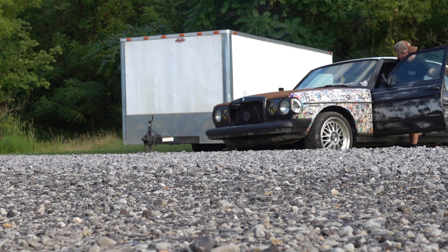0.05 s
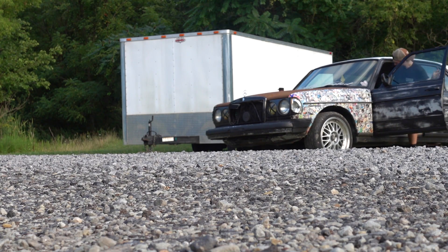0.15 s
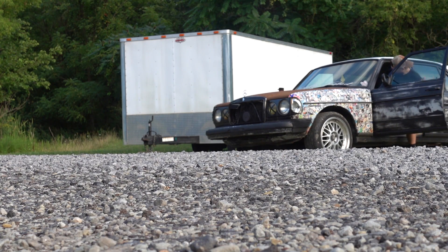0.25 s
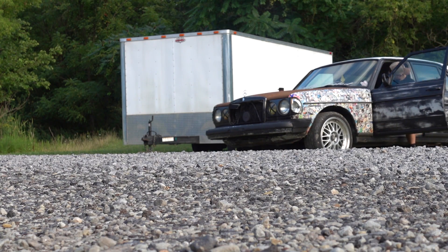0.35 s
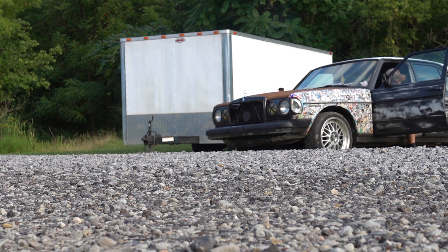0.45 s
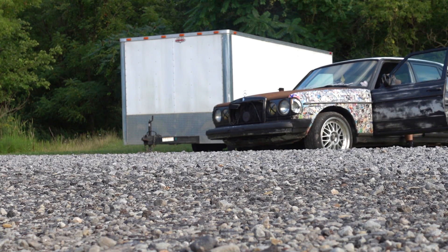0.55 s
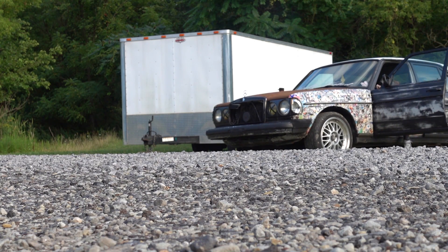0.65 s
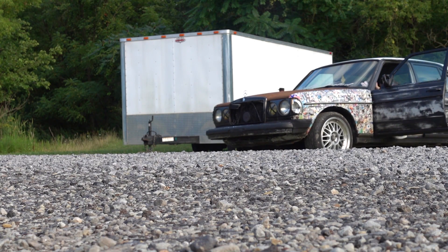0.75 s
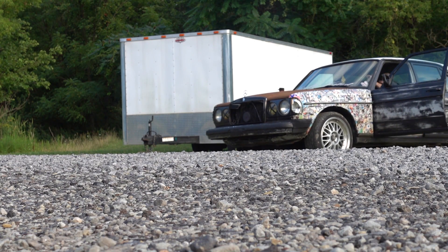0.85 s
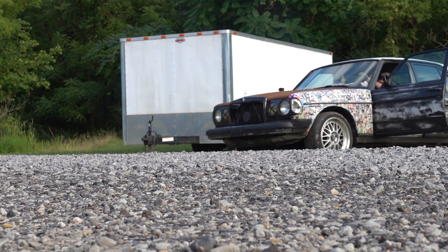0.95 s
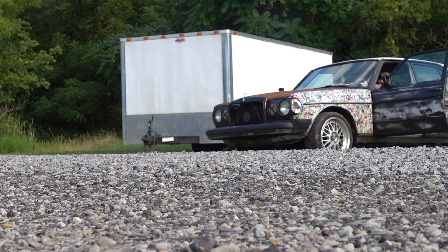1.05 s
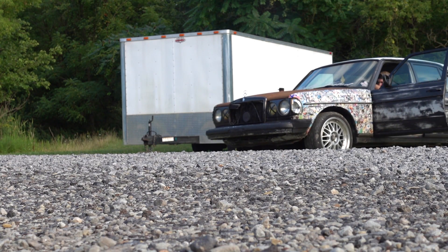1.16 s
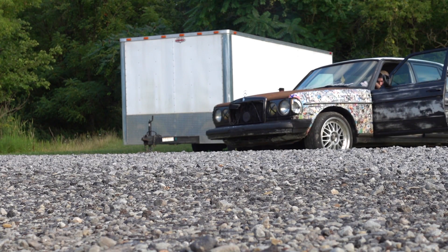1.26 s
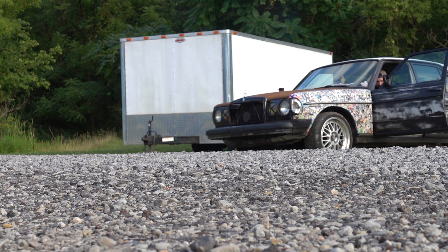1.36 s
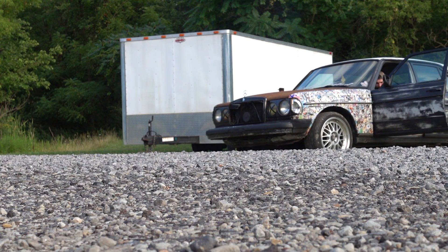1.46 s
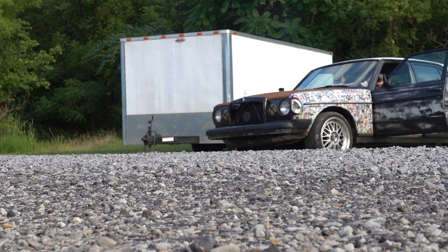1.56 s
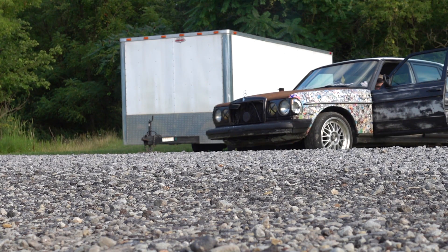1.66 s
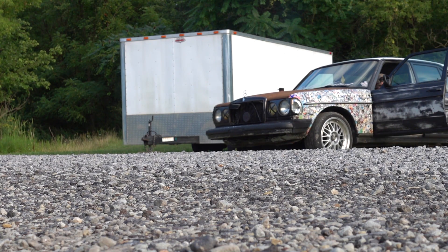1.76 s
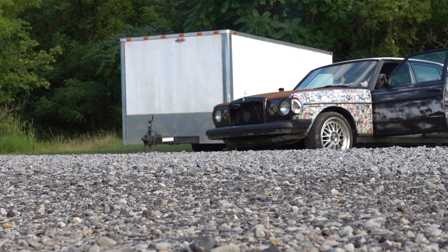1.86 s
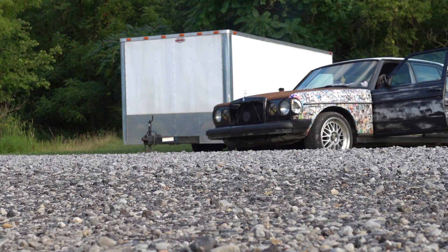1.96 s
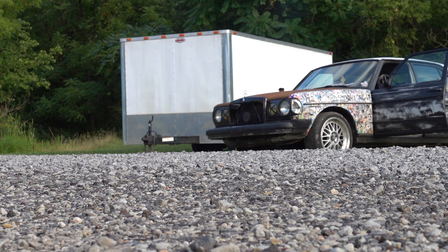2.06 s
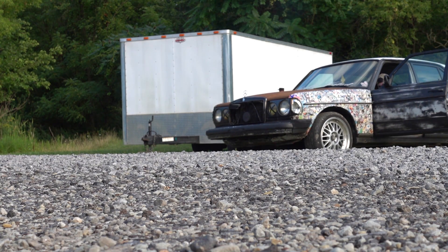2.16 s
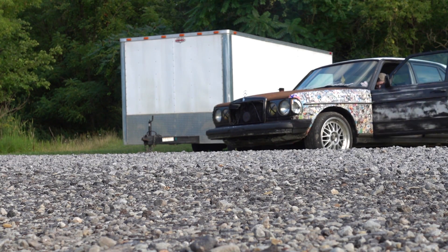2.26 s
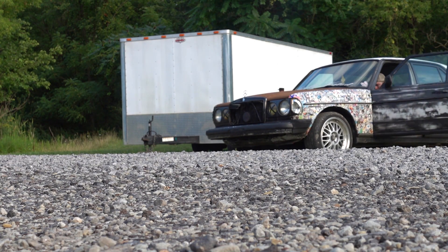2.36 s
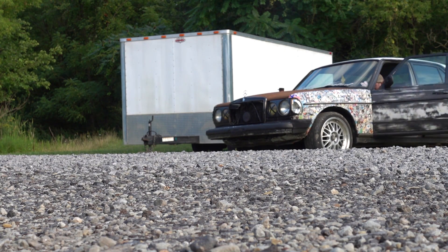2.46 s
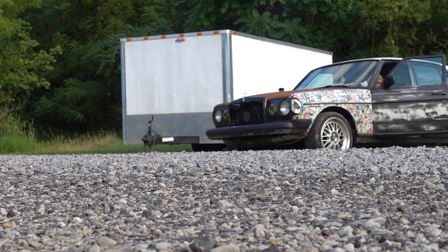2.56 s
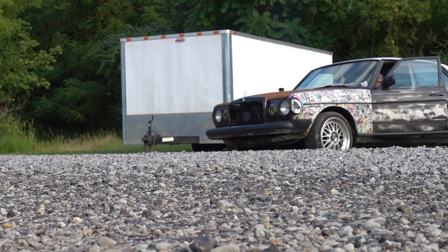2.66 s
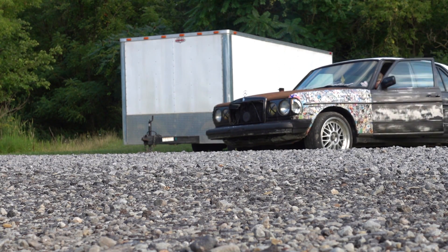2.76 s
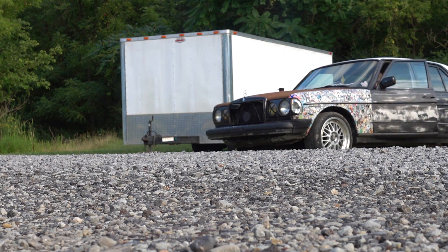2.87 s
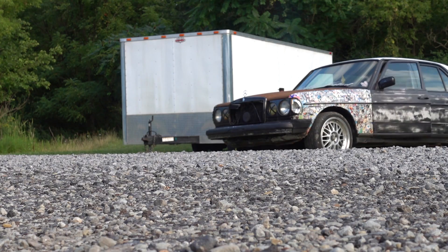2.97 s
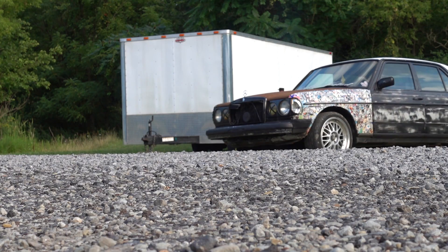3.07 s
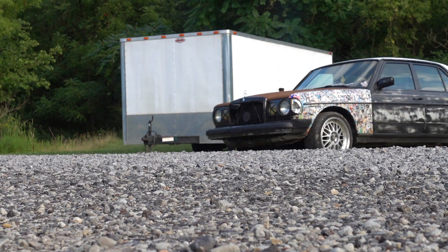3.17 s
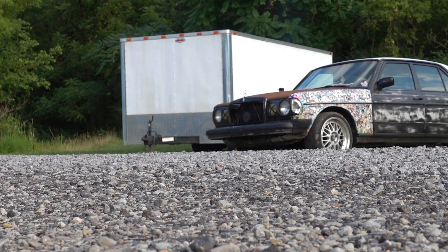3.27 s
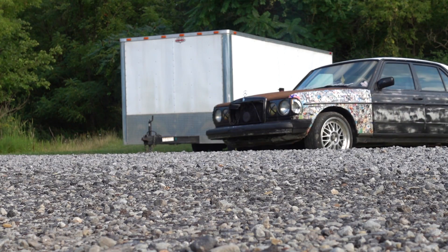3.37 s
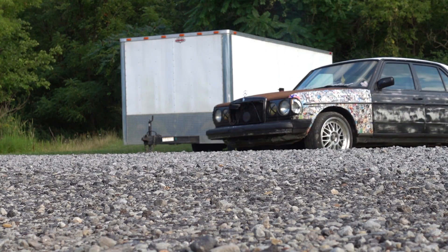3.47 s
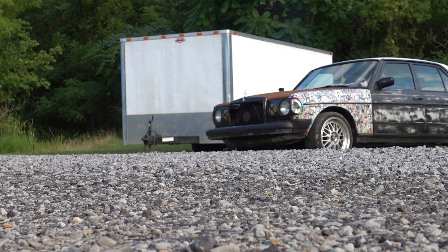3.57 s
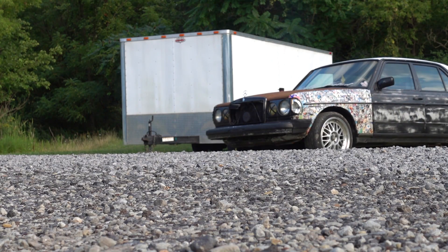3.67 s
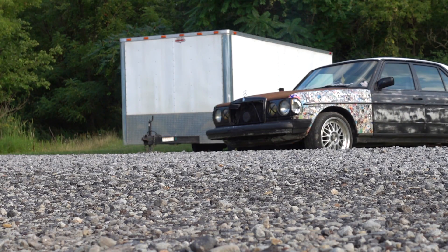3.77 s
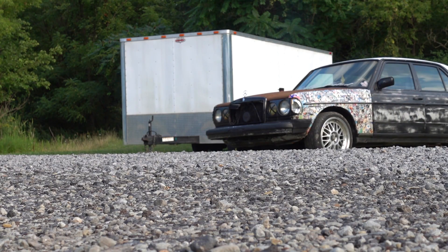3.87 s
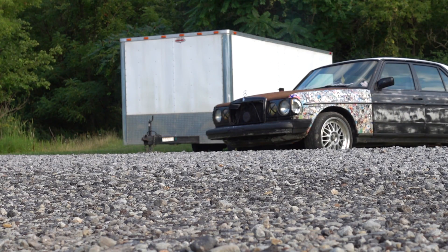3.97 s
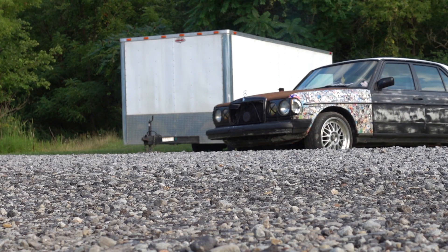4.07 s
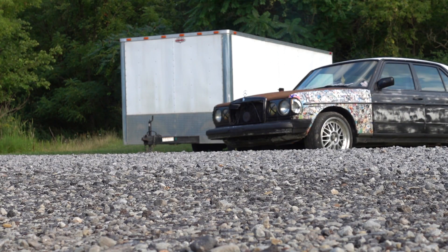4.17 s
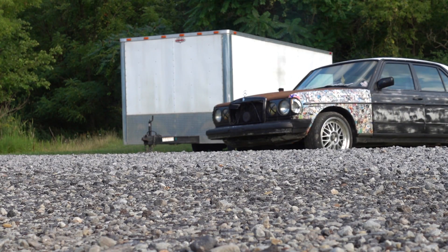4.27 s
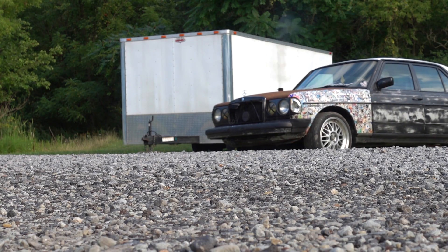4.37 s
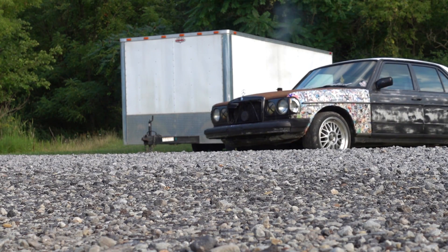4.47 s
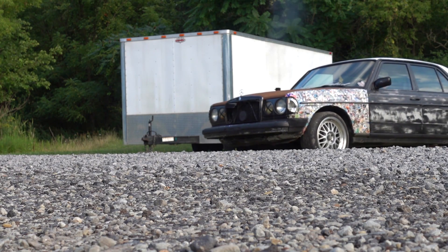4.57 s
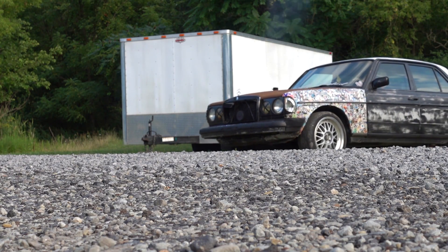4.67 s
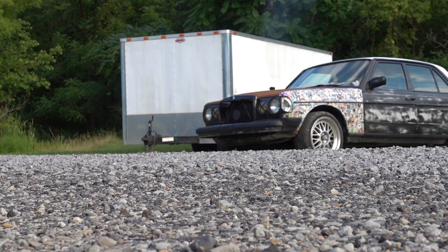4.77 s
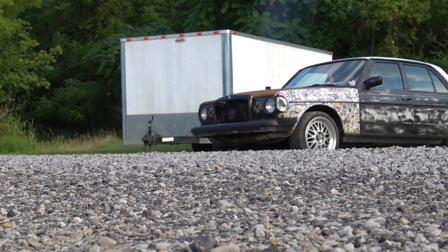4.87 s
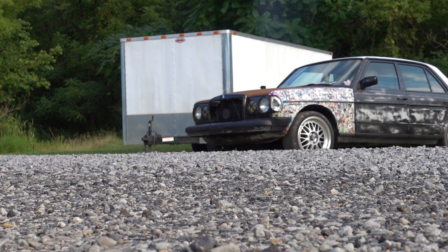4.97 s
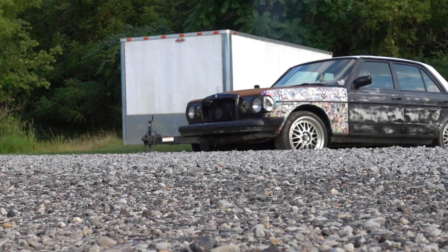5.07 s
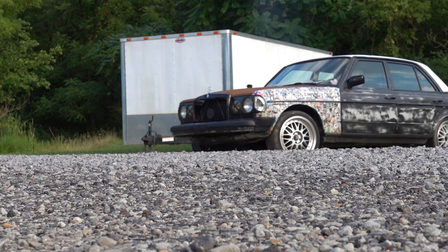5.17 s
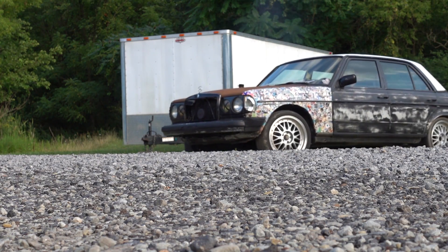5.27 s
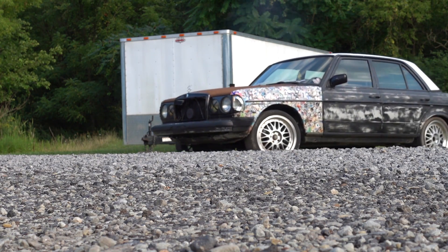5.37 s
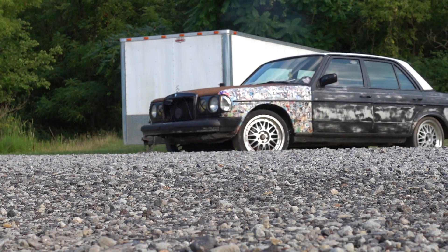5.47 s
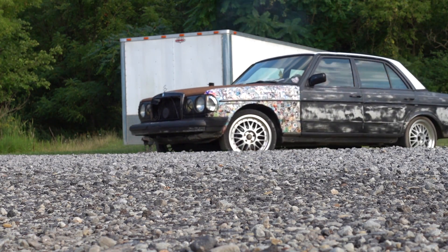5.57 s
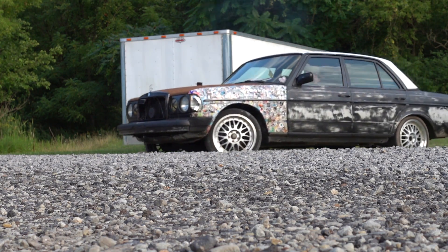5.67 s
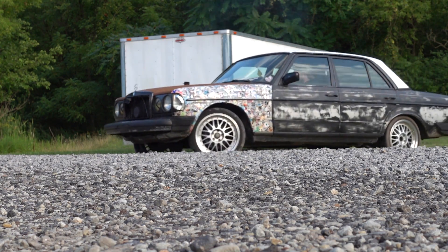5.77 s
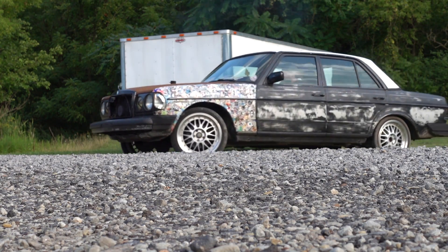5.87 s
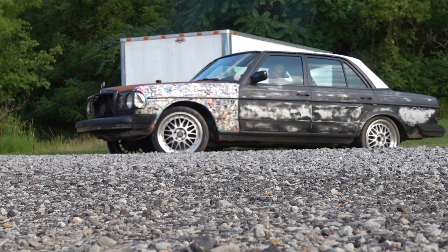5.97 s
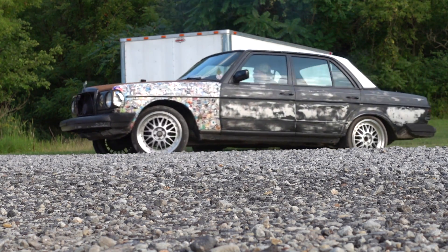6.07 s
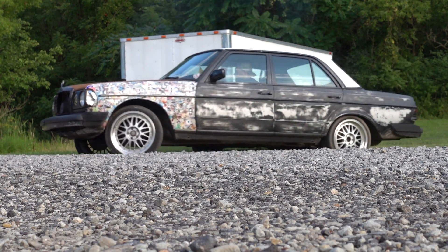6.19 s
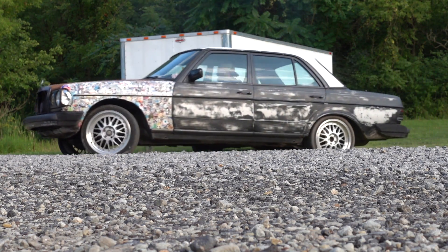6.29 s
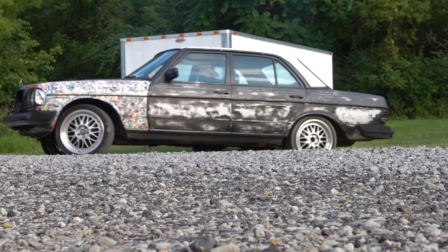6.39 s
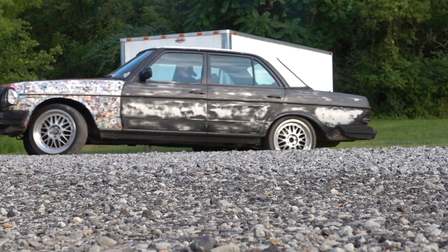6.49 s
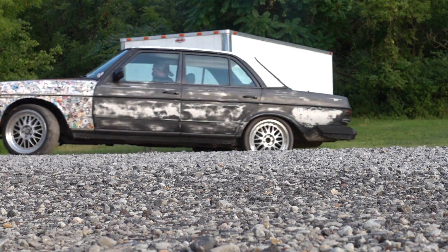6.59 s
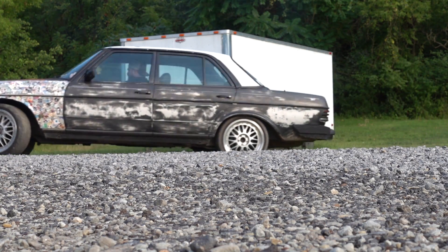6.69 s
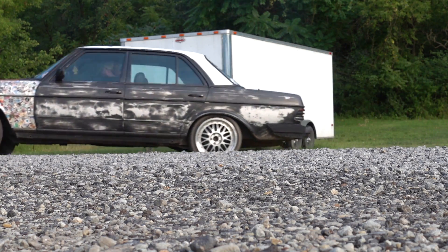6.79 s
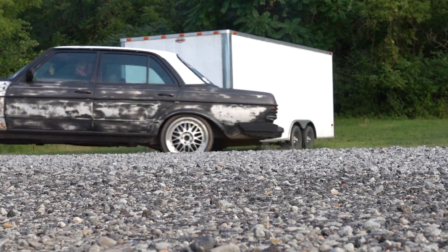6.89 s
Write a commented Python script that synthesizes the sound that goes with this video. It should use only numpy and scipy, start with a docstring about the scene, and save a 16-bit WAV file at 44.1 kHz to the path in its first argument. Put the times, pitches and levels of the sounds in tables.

```python
"""First heard: an old five-cylinder diesel car idling unevenly on gravel, with insects hissing in the trees.
A bird chirps once and a door is pulled shut; then the throttle opens and the car rolls off left over the stones.
The engine is built from timed firings that ring resonances, gate noise and, under throttle, drive steady tones.
The door is fading panel tones and latch noise, the gravel filtered snaps, the insects and leaves shaped noise,
the bird a falling tone."""
import sys
import numpy as np
from scipy import signal
from scipy.fft import rfft, irfft, next_fast_len
from scipy.io import wavfile
from scipy.ndimage import uniform_filter1d

SR = 44100
rng = np.random.default_rng(int(sys.argv[2]) if len(sys.argv) > 2 else 0)


def bounce(signal):
    """Save signal as a 16-bit WAV file at the path given by the first command-line argument."""
    frames = np.transpose(np.atleast_2d(signal))
    limited = np.clip(frames, -1, 1)
    pcm = np.round(limited * 32767).astype(np.int16)
    wavfile.write(sys.argv[1], SR, pcm)


N = 305613

# Levels in the tables are relative: the functions scale them further.
# Engine speed: t/s, rate/firings per s
FIRING_RATE = [(0, 30.56), (4.0, 30.5), (4.18, 29.25), (4.29, 30.32), (4.36, 43.2), (4.55, 55.07),
               (4.8, 60.34), (5.15, 60.71), (5.45, 66.41), (5.7, 75.33), (6.15, 82.39), (6.4, 74.88),
               (6.75, 68.79), (6.93, 70.13)]
# How the cylinders differ: knock level/dB, knock delay/ms, lower ring level/dB, clack level/dB
CYLINDERS = [(-1.5, -7, -4.5, -8), (2.5, -4, -6.5, -7), (-13, -8, -11, -22), (-8, -8, -12.5, -19),
             (-3, -8, 0.5, 0)]
# Puffs of each cylinder: intake level/dB, intake delay/ms, exhaust level/dB, exhaust delay/ms
PUFFS = [(-4.7, 20.3, -7.4, 4.3), (-9.1, 20.2, -12.6, 6.7), (-4.3, 21.4, -8.8, 3.9), (-.8, 22.5, -5.6, 6.8),
         (-6.3, 20.5, -5.6, 7.6)]
# Resonances of the intake: f/Hz, width/Hz, level/dB
INTAKE_MODES = [(96, 17.2, -3.1), (121, 11.3, 0)]
# Resonances of the exhaust: f/Hz, width/Hz, level/dB
EXHAUST_MODES = [(171.9, 13.5, 2.6), (195.1, 18.8, 0)]
# Upper ring of the engine block: f/Hz, width/Hz, level/dB
BLOCK_MODES = [(1690, 36, 2), (1806, 50, -6)]
# Lower ring of the engine: f/Hz, width/Hz, level/dB
SUMP_MODES = [(262, 200, -12.5), (790, 410, -13.5), (1217, 26, 8.5), (1425, 37, 12.5)]
# Colour of the clack at idle: f/Hz, level/dB
CLACK_COLOUR = [(1200, 2.5), (2300, 0), (3400, -6), (4700, 2), (6500, -8.5), (11000, -12), (15700, -21)]
# Colour of valve gear and fan at idle: f/Hz, level/dB
TICKOVER_COLOUR = [(130, -14), (220, -2), (258, -8.5), (441, -7), (500, -5.5), (933, -10), (1480, -9.5),
                   (1710, -10.5), (2400, -26), (6400, -39.5), (7650, -25.5), (9310, -37), (15600, -52)]
# Combustion strength: t/s, level/dB
LOAD = [(4.2, -19), (4.27, -13), (4.3, -3.5), (4.36, -0.5), (4.52, 1.5), (5.07, -3.5), (5.7, -2.5),
        (6.2, -2.5)]
# Colour of the clatter under throttle: f/Hz, level/dB
CLATTER_COLOUR = [(1290, -9), (2200, -0.5), (2470, -0.5), (2680, -5), (2860, -5.5), (3100, -10.5),
                  (3370, 1), (3660, -4), (4340, -4.5), (5930, 3), (9010, -2.5), (9780, -3), (12400, -6.5),
                  (15600, -12)]
# Colour of the roar under throttle: f/Hz, level/dB
ROAR_COLOUR = [(120, -7), (200, 1), (356, -8.5), (399, -4.5), (600, -6), (753, -6), (1610, -11),
               (2710, -32.5), (3000, -18.5), (3900, -52), (6600, -120)]
# Resonances of the leaking pipe, before the heat factor: f/Hz, width/Hz, level/dB
PIPE_MODES = [(593, 31, 3.5), (966, 20, -2.5), (1324, 35, -7), (1617, 90, -5), (2043, 26, -11.5),
              (2460, 51, -11), (2880, 39, -11.5), (3300, 18, -19)]
# Hot gas shifts the pipe's tones: t/s, factor on f
PIPE_HEAT = [(4.3, 0.97), (5, 0.99), (6, 1.053), (6.93, 0.9)]
# Tones under throttle: t/s, firing tone level/dB, its octave level/dB
FIRING_TONES = [(4.28, -45, -47), (4.36, -31, -27), (4.52, -32, -17.5), (4.85, -45, -15.5),
                (5.45, -45, -16), (5.64, -23.5, -17.5), (5.87, -20, -22.5), (6.13, -24, -22.5),
                (6.32, -25, -12), (6.49, -43, -12.5), (6.82, -31, -12.5), (6.93, -37, -13)]
# Tones at multiples of the five-firing cycle: multiple, level/dB
ORDER_TONES = [(7, -3.5), (8, -12.5), (9, 4.5), (11, -3.5), (12, -5.5), (13, -18), (14, -4), (15, -0.5),
               (16, -5.5), (17, -9), (18, -6.5), (20, 0.5), (21, -7), (22, -3), (23, -15), (24, -6.5),
               (26, -4.5), (34, -5), (36, -20.5), (40, -5), (41, -12.5)]
# Bird chirp, a single row: t/s, length/s, start f/Hz, end f/Hz, level/dB
CHIRP = (1.487, .04, 3980, 3800, -52)
# Small ticks: t/s, level/dB, f/Hz
TICKS = [(2.51, -33, 850), (2.512, -48, 11000), (2.52, -50, 13000), (3.335, -46, 11000)]
# Contacts of the closing door: t/s, panel level/dB, latch click level/dB
DOOR_CONTACTS = [(3.166, -21.5, -29.5), (3.184, -10.5, -26), (3.199, -16.5, -30.5), (3.209, -15, -50),
                 (3.215, -16, -56), (3.229, -25, -54), (3.248, -21.5, -46)]
# Ringing of the door panel: f/Hz, level/dB, time to fade by 60 dB/s
PANEL_MODES = [(42, -9, .12), (77.6, -3.5, 0.14), (143, -14, .06), (178, 1.5, 0.11), (259, -8, 0.079),
               (295, -2.5, 0.079), (390, -4, 0.045), (490, 1, 0.042), (626, 1, 0.014), (1380, -8.5, 0.032),
               (2350, -17, 0.024)]
# Colour of the latch clicks: f/Hz, level/dB
LATCH_COLOUR = [(500, 3), (1200, 8), (2300, -3), (5500, -8.5), (9000, -15), (15000, -25)]
# Body booms over bumps: t/s, level/dB, f/Hz, length/s
BODY_BOOMS = [(6.65, -18.5, 220.5, 0.063), (6.824, -16.5, 228, 0.038)]
# Colour of the far leaves: f/Hz, level/dB
LEAVES_COLOUR = [(300, -20), (1000, -10), (3000, 1.5), (6000, 0.5), (10000, -9), (15700, -14)]
# Colour of the low air rumble: f/Hz, level/dB
RUMBLE_COLOUR = [(20, -2), (35, -6.5), (60, -5), (110, 3), (200, 7.5), (300, -45)]
# Colour of the echo that differs between the sides: f/Hz, level/dB
ECHO_COLOUR = [(60, -35), (130, -43), (290, -15), (640, -14), (1400, -16.5), (3000, -0.5), (5000, 3),
               (8000, -3.5), (15000, -11)]
# Place of the car: t/s, left minus right level/dB, echo level/dB
PAN = [(0, -1.5, -7), (4.2, 0, -3.5), (5.2, 1, -1), (5.7, 2, -1.5), (6.1, 1.7, 0.5), (6.93, 1, 2)]
# Colour difference of the sides: f/Hz, left minus right level/dB
SIDE_COLOUR = [(60, 0), (200, 0), (380, -0.2), (950, 1), (2380, 1), (5980, -0.5), (15000, -2.5)]
# Phase difference of the sides: f/Hz, lead of the left/rad
LEFT_LEAD = [(20, 0), (200, -0.018), (700, 0.32), (1500, 0.51), (3360, 0.53), (4740, 1.5), (6030, -0.2),
             (8870, -0.34), (15300, 1.2)]

FIRST_TURN = -.096  # firing count at the start
PEDAL_S = 4.21  # the throttle opens
CLATTER_DB, ORDERS_DB = -25, -29.5  # at load 0 dB
ROAR_DB, ROAR_DB_PER_RATE = -21.5, 0.1  # at 60 firings a second; change per firing a second
ORDERS_FOLLOW = 0.22  # dB per dB of load
PASS_S, PASS_LENGTH_S = 6.09, 0.5  # the bonnet turns away from the listener
PASS_CLATTER_DB, PASS_ROAR_DB, PASS_PIPE_DB = -6.5, 0.5, -7  # changes once passed
DULL_S, DULL_LENGTH_S = 5.67, 1.2  # the top treble fades as the grille turns aside
TOP_DB, DULL_TOP_DB = 1, -10  # lift of the top treble, and its change by then
TOP_HZ = 15760  # upper limit of all sound


def amp(db):
    """dB to gain."""
    return 10 ** (np.asarray(db) / 20)


def unit(x):
    """Scaled to an average strength (rms) of 1."""
    return x / np.sqrt(np.mean(x ** 2) + 1e-20)


def curves(rows):
    """One value per sample for each column after the time."""
    s, *cols = np.transpose(rows)
    return [np.interp(np.arange(N) / SR, s, c) for c in cols]


def along(points, hz):
    """Value at hz, read between (f, value) points on a log axis."""
    f, v = np.transpose(points)
    return np.interp(np.log(hz + 1), np.log(f + 1), v)


def wobble(count):
    """A random curve with count knots a second."""
    knots = int(count * N / SR) + 2
    return np.interp(np.arange(N) * count / SR, np.arange(knots), rng.standard_normal(knots))


def filtered(x, response):
    """x shaped by a gain, possibly complex, at each frequency."""
    m = next_fast_len(N + SR // 2)
    return irfft(rfft(x, m) * response(np.fft.rfftfreq(m, 1 / SR)), m)[..., :N]


def colour(points):
    """Gain at each frequency from (f, level) points."""
    return lambda hz: amp(along(points, hz))


def noise(points):
    """Coloured noise of rms 1."""
    return unit(filtered(rng.standard_normal(N), colour(points)))


def modes(table):
    """Response of resonances that ring on after a blow, with alternating signs."""
    def response(f):
        return sum((-1) ** k * amp(db) * 1j * f * w / (c * c - f * f + 1j * f * w)
                   for k, (c, w, db) in enumerate(table))
    return response


def gliding(x, table, factor):
    """Resonances whose centres follow a factor over time."""
    out, warped = 0, np.cumsum(factor) / SR
    for hz, width, db in table:
        spin, pole = np.exp(2j * np.pi * hz * warped), np.exp(-np.pi * width / SR)
        # shift the centre to 0 Hz, smooth, then shift back
        smooth = signal.lfilter([np.sqrt(1 - pole)], [1, -pole], x * spin.conj())
        out = out + amp(db) * np.real(spin * smooth)
    return out


def train(seconds, sizes):
    """Single-sample pulses."""
    at = np.round(seconds * SR).astype(int)
    keep = (at >= 0) & (at < N)
    return np.bincount(at[keep], sizes[keep], N)


def bursts(pulses, ms):
    """Every pulse becomes a short swell that peaks after ms."""
    u = np.arange(SR // 10) / (SR * ms / 1000)
    return np.abs(signal.fftconvolve(pulses, (u * np.exp(1 - u)) ** 2)[:N])


def idle_engine(time, turn, fired, number, luck, throttle):
    """Each firing knocks the block, clacks the injector and puffs into intake and exhaust."""
    # the cylinders differ, so the pattern repeats every fifth firing
    knock_db, knock_ms, low_db, clack_db = np.array(CYLINDERS)[number % len(CYLINDERS)].T
    in_db, in_ms, out_db, out_ms = np.array(PUFFS)[number % len(PUFFS)].T
    puffs = filtered(train(fired + in_ms / 1000, amp(in_db + luck[:, 0])), modes(INTAKE_MODES))
    puffs += filtered(train(fired + out_ms / 1000, amp(out_db + luck[:, 1])), modes(EXHAUST_MODES))
    puffs = filtered(puffs, lambda hz: 1 / (1 + (70 / (hz + 1)) ** 6))  # the pipes radiate no deeper bass
    blows = train(fired + knock_ms / 1000, amp(knock_db + 1.2 * luck[:, 2]))
    low_blows = train(fired - .008, amp(low_db + luck[:, 4]))
    # each blow is a clean strike with a short rattle after it
    rattle = .03 * rng.standard_normal((2, N))
    knock = unit(filtered(blows + bursts(blows, 5.9) * rattle[0], modes(BLOCK_MODES)))
    knock += 0.56 * unit(filtered(low_blows + bursts(low_blows, 8.8) * rattle[1], modes(SUMP_MODES)))
    knock = filtered(knock, lambda hz: 1 / (1 + (hz / 2100) ** 8))  # the strike's edge is softened above about 2 kHz
    clack_gate = bursts(train(fired - .007, amp(clack_db + 2 * luck[:, 3])), 4.5)
    clack = unit(clack_gate * noise(CLACK_COLOUR))
    gear_gate = bursts(train(fired - .008, amp(0.62 * low_db + 2 * luck[:, 4])), 10.7)
    gear = unit((1 + 0.98 * gear_gate) * noise(TICKOVER_COLOUR))
    # the first strong firings boom in the same pipes
    catch = amp(8) * np.exp(-((time - 4.37) / 0.11) ** 2)
    # the block knocks hardest as the load comes on
    strain = amp(6.0) * throttle * np.exp(-np.abs(time - 4.4) / 0.36)
    idle = 1 - throttle
    sound = (idle + catch) * amp(32) * puffs
    sound += (idle + strain) * amp(-36.0) * knock
    firing_tone = amp(-50.0) * np.cos(2 * np.pi * turn)
    return sound + idle * (firing_tone + amp(-50) * clack + amp(-33.5) * gear)


def throttle_engine(time, rate, turn, fired, number, luck):
    """Firing bursts gate clatter and roar, a leaking pipe rings, and tones follow the engine speed."""
    clack_db = np.array(CYLINDERS)[number % len(CYLINDERS), 3]
    out_db = np.array(PUFFS)[number % len(PUFFS), 2]
    (load_db,), (tone_db, octave_db) = curves(LOAD), curves(FIRING_TONES)
    passed = np.clip((time - PASS_S) / PASS_LENGTH_S, 0, 1)
    on = slice(round(PEDAL_S * SR), N)
    # injection comes earlier at high speed, and the bursts blur together
    speed = np.interp(fired, time, rate)
    early = fired - .22 * np.clip((speed - 71) / 6, 0, 1) / speed
    gate = bursts(train(early - .004 + 0.00031 * luck[:, 4], amp(0.035 * clack_db + 2 * luck[:, 5])), 3.67)
    gate += 0.43 * bursts(train(early - .001, amp(4.2 * luck[:, 3])), 0.22)  # a sharp tick inside each burst

    hiss = noise(CLATTER_COLOUR) * (gate + 0.16 + 0.0068 * (rate - 30))
    hiss /= np.sqrt(np.abs(uniform_filter1d(hiss ** 2, SR // 8)) + 1e-9)  # even out the slow level
    tilt = amp(TOP_DB + DULL_TOP_DB * np.clip((time - DULL_S) / DULL_LENGTH_S, 0, 1))
    high = filtered(hiss, lambda hz: 1 / (1 + (10000 / (hz + 1)) ** 8))
    clatter_db = CLATTER_DB + load_db + PASS_CLATTER_DB * passed
    clatter = amp(clatter_db) * (hiss + (tilt - 1) * high)

    blast = (gate + 1.06) * rng.standard_normal(N) - 14 * train(early, amp(0.08 * out_db + luck[:, 2]))
    pipe, orders = np.zeros((2, N))
    pipe[on] = unit(gliding(blast[on], PIPE_MODES, curves(PIPE_HEAT)[0][on]))
    roar_db = ROAR_DB + ROAR_DB_PER_RATE * (rate - 60) + PASS_ROAR_DB * passed
    roar = amp(-3.0 + PASS_PIPE_DB * passed) * pipe
    roar += amp(-4) * unit((gate + 1.1) * noise(ROAR_COLOUR))
    roar = filtered(amp(roar_db) * roar, lambda hz: 1 / (1 + (60 / (hz + 1)) ** 4))  # the roar carries no deep bass

    tones = amp(tone_db + 1.1 * wobble(count=10)) * np.cos(2 * np.pi * (turn + 0.068))
    tones += amp(octave_db) * np.cos(4 * np.pi * (turn + 0.38))
    cycle = turn[on] / len(CYLINDERS)
    for multiple, db in ORDER_TONES:
        level = amp(db + 3.14 * wobble(count=10)[on])
        orders[on] += level * np.cos(2 * np.pi * (round(multiple) * cycle + rng.random()))
    orders_db = ORDERS_DB + ORDERS_FOLLOW * load_db
    return clatter + roar + tones + amp(orders_db) * orders


def engine():
    """One row of firings drives the idle sound and, as the throttle opens, the driving sound."""
    time, rate = np.arange(N) / SR, curves(FIRING_RATE)[0]
    turn = np.cumsum(rate) / SR + FIRST_TURN  # running count of firings
    number = np.arange(int(turn[-1]))
    fired = np.interp(number, turn, time)
    luck = rng.standard_normal((len(number), 6))  # no two firings are alike
    throttle = np.clip((time - PEDAL_S) / 0.12, 0, 1)
    sound = idle_engine(time, turn, fired, number, luck, throttle)
    return sound + throttle * throttle_engine(time, rate, turn, fired, number, luck)


def yard():
    """A steady insect band unlike on both sides, a higher pulsing one that joins, far leaves and air rumble."""
    band = [(6000, -42), (7100, -6.5), (7750, 0), (8400, -11), (9500, -40), (12000, -60)]
    mid, side = noise(band), noise(band)
    insects = amp(-51) * np.array([mid + 1.4 * side, mid - 1.54 * side])
    time = np.arange(N) / SR
    pulsing = np.clip((time - 2.6) / .4, 0, 1) * (.4 + np.sin(np.pi * 49 * time) ** 2)  # 49 pulses a second
    high = amp(-62) * pulsing * noise([(13500, -60), (14300, -6), (15000, 2), (15800, -5)])
    rustle = amp(-52.5) * np.array([noise(LEAVES_COLOUR), noise(LEAVES_COLOUR)])
    return insects + high + rustle + amp(-40) * noise(RUMBLE_COLOUR)


def small_sounds():
    """One falling bird chirp, a gliding tone, and a few short ticks of fading band noise."""
    out, t = np.zeros(N), np.arange(SR // 20) / SR
    s, length, from_hz, to_hz, db = CHIRP
    u = np.clip(t / length, 0, 1)
    phase = 2 * np.pi * np.cumsum(from_hz + (to_hz - from_hz) * u) / SR
    out[round(s * SR):][:len(t)] += amp(db) * np.sin(np.pi * u) * np.sin(phase)
    for s, db, hz in TICKS:
        band = signal.butter(1, [.8 * hz, 1.2 * hz], "band", fs=SR)
        puff = signal.lfilter(*band, rng.standard_normal(len(t)))
        out[round(s * SR):][:len(t)] += amp(db - 60 * t / .04) * unit(puff)
    return out


def door():
    """Each contact of the closing door rings the panel through its soft seal and clicks the latch."""
    thud, clicks, t = np.zeros(N + SR), np.zeros(N + SR), np.arange(SR // 3) / SR
    for s, db, click_db in DOOR_CONTACTS:
        ring = 0
        for hz, level, t60 in PANEL_MODES:
            fade = amp(level + rng.normal(0, 1.5) - 60 * t / t60)
            ring = ring + fade * np.sin(2 * np.pi * (hz * t + rng.random()))
        soft_start = 1 - np.exp(-t / 0.0023)
        thud[round(s * SR):][:len(t)] += amp(db) * ring * soft_start
        clicks[round(s * SR):][:len(t)] += amp(click_db - 60 * t / 0.099)
    return thud[:N] + clicks[:N] * noise(LATCH_COLOUR)


def gravel():
    """Stones snap under the rolling tyres: random pulses ring three broad resonances."""
    draw = rng.random((900, 3))
    rolling = np.clip((np.arange(N) / SR - 4.9) / 1.2, 0, 1)
    sizes = amp(14 * draw[:, 1] ** 2) * np.sign(draw[:, 2] - .5)
    snaps = train(4.9 + 2.03 * draw[:, 0], sizes)
    stones = modes([(1200, 1000, -6), (4500, 4000, -3), (9500, 5000, -9.5)])
    return amp(-47) * rolling * unit(filtered(snaps, stones))


def booms():
    """Brief low swells of the body shell, each a tone that rises and fades smoothly."""
    time, out = np.arange(N) / SR, np.zeros(N)
    for s, db, hz, length in BODY_BOOMS:
        out += amp(db) * np.exp(-((time - s) / length) ** 2) * np.sin(2 * np.pi * hz * time)
    return out


def spread(x):
    """Scattered echoes reach the two sides unlike; the sides differ in colour and lag; the car drifts left."""
    z = signal.stft(x, nperseg=512)[2]
    scattered = signal.istft(z * np.exp(2j * np.pi * rng.random(z.shape)), nperseg=512)[1][:N]
    pan_db, echo_db = curves(PAN)
    side = amp(echo_db) * filtered(scattered, colour(ECHO_COLOUR))
    half = np.array([[.5], [-.5]])  # each side takes half of a difference
    pair = np.array([x + side, x - side]) * amp(half * pan_db)

    def ears(hz):
        return amp(half * along(SIDE_COLOUR, hz)) * np.exp(1j * half * along(LEFT_LEAD, hz))
    return filtered(pair, ears)


def scene():
    """Car and small sounds spread over both sides, in the yard's air."""
    return spread(engine() + small_sounds() + door() + gravel() + booms()) + yard()


def record(dry):
    """Nothing is kept above the upper limit."""
    return filtered(dry, lambda hz: hz < TOP_HZ)


dry = scene()
out = record(dry)
bounce(out)
```